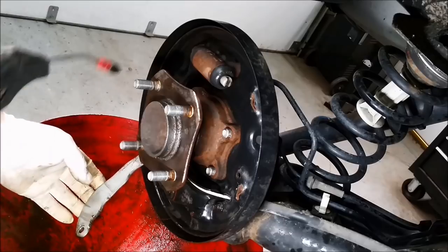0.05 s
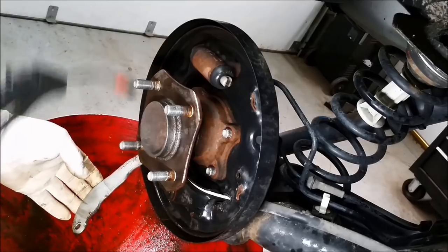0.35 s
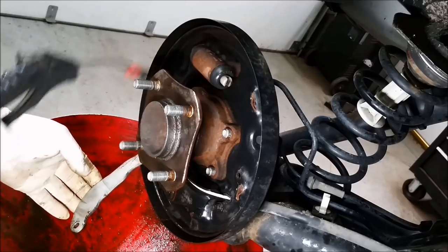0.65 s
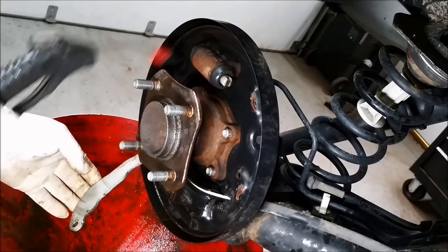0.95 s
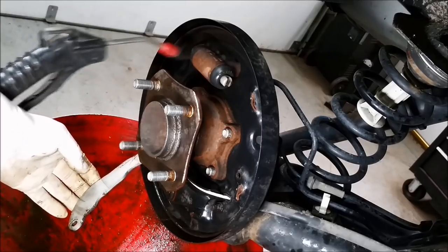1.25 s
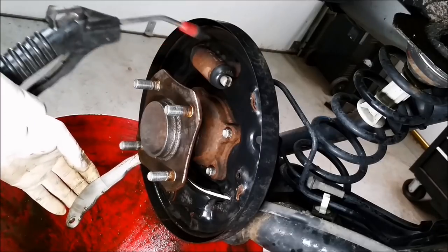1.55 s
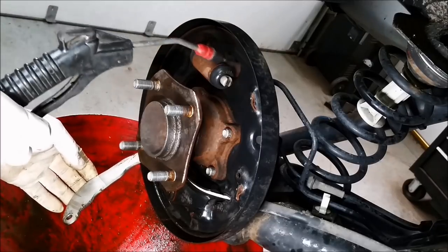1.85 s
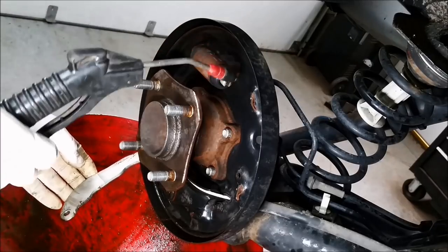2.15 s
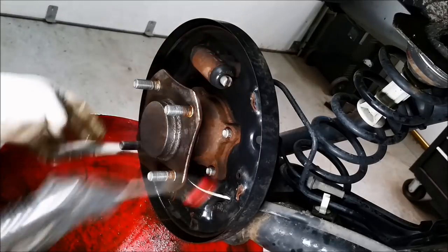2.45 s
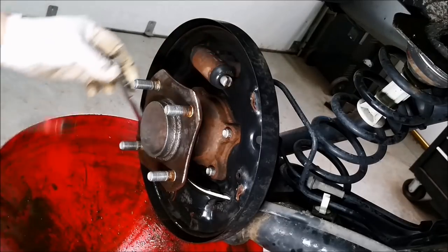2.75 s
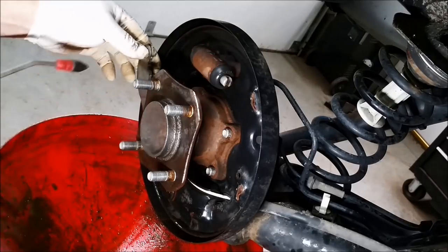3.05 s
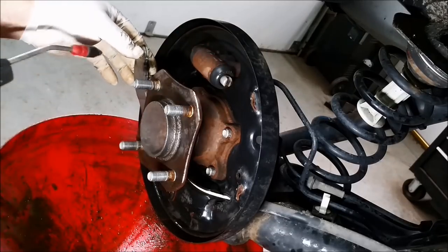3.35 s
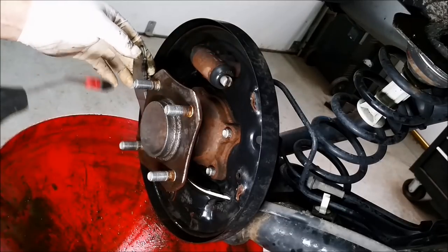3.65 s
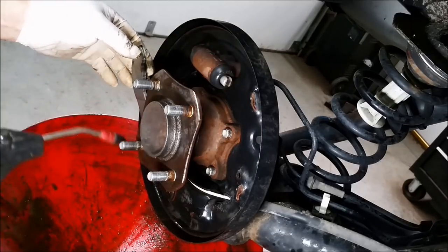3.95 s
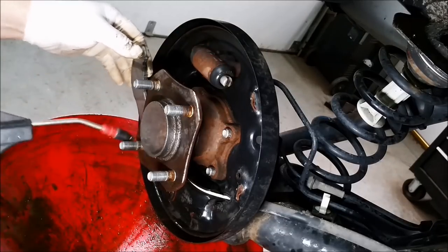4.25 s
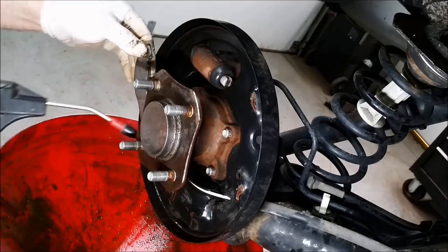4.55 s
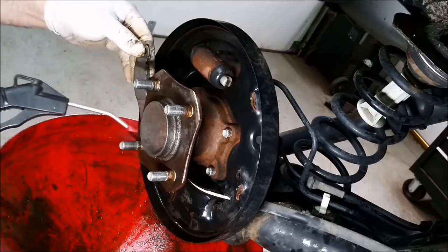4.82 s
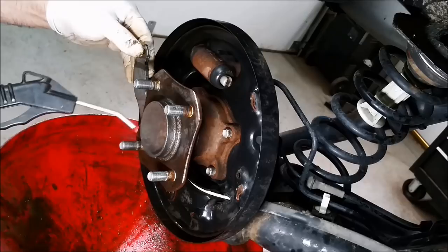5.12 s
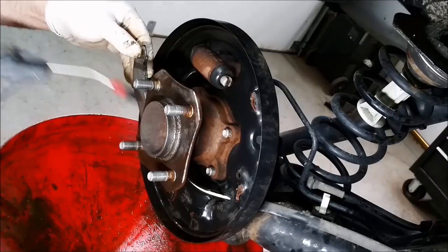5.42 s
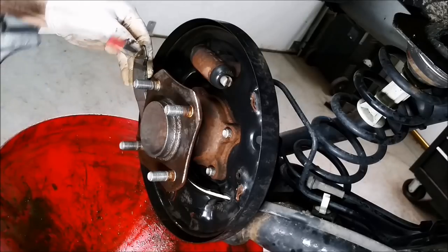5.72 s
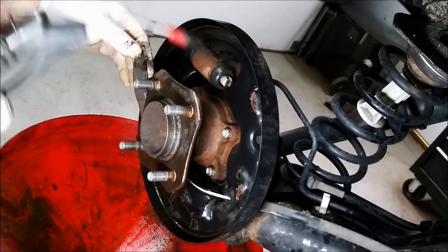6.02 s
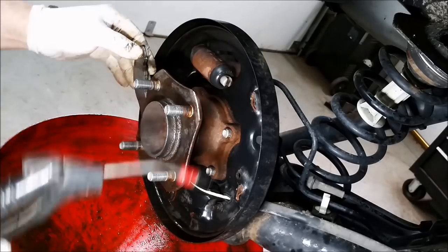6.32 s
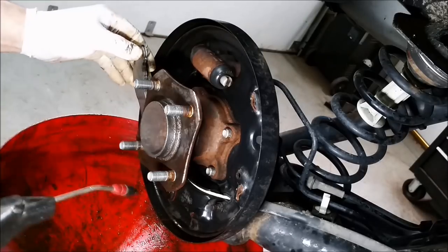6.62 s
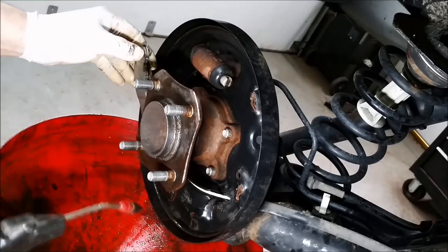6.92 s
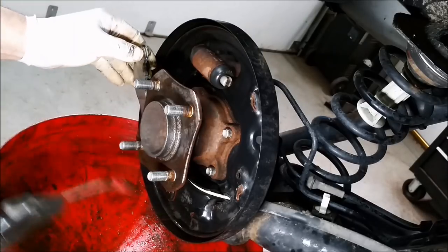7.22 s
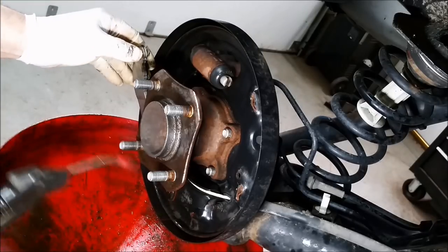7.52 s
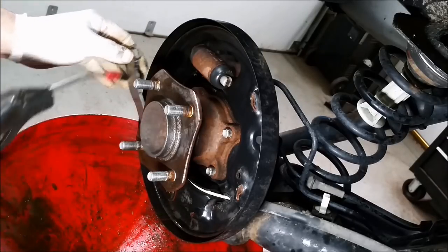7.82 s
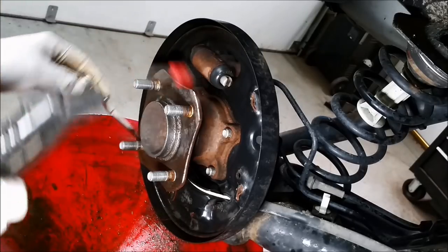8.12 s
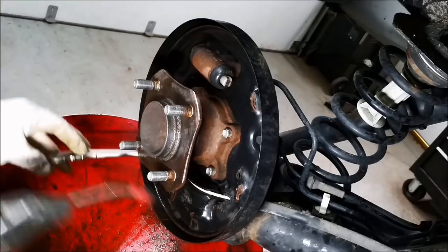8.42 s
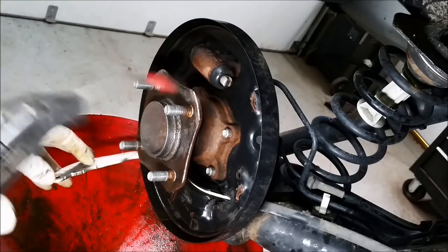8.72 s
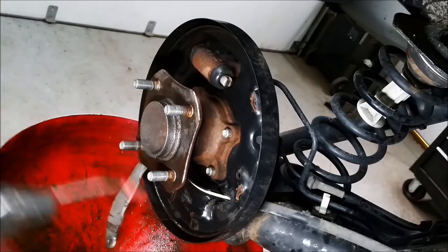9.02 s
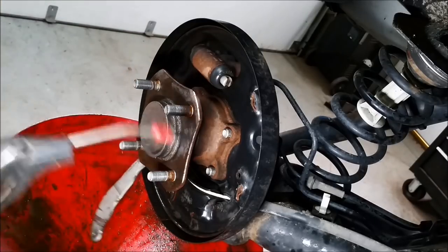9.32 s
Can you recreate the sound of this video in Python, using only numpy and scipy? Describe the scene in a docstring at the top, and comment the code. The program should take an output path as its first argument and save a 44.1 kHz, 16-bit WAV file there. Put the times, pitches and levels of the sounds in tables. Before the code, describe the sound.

Close, loud hissing from an air gun blows water off a metal brake plate in four blasts, separated by short lulls with small puffs. The moving jet keeps changing colour, from a thin high hiss to a sharp rasp, breathy whistles and a hollow roar. Faint droplet ticks and dull hose knocks sit underneath. The final blast is the longest and fades quickly on release, with little echo from the garage.

```python
"""A compressed-air blowgun dries a wet brake backing plate in a garage.
The nozzle hisses; swept about, the jet rasps and sings on edges, roars in hollows and buffets the plate,
whose resonances colour the air noise. The trigger is eased three times, with little spits of air, and
let go at the end. Drops spatter off the metal, hose and cable knock, and a faint hum lies underneath."""
import sys
import numpy as np
from scipy import signal
from scipy.fft import rfft, irfft, next_fast_len
from scipy.io import wavfile

SR = 44100
rng = np.random.default_rng(int(sys.argv[2]) if len(sys.argv) > 2 else 0)


def pcm_store(signal):
    """Save signal as 16-bit PCM."""
    levels = np.round(np.clip(np.atleast_2d(signal), -1, 1) * 32767)
    wavfile.write(sys.argv[1], SR, levels.astype(np.int16).T)


N = 417623
TIME = np.arange(N) / SR
CONTROL_TIME = np.arange(0, N, 32) / SR  # coarse clock for the level curves

# Trigger squeezes. Each row: open at in seconds, hold in seconds, opening rate in dB per second,
# first flow in dB, final flow in dB, seconds to press home.
SQUEEZES = [(0.0, 2.513, 2000, -29.5, -28.5, 1.6), (2.894, 1.163, 800, -37.5, -24.5, 0.94),
            (4.268, 0.021, 500, -52, -54.5, .02), (4.617, .768, 234, -28, -28, 0.44),
            (5.45, .35, 1000, -47.5, -46, .3), (5.8, 3.493, 600, -44, -29, 0.76)]
# Wrist flicks swing the hiss towards or away from us. Each row: middle and length in seconds, gain in dB.
WRIST_SWINGS = [(0.018, .04, 5), (0.104, .045, -5), (0.149, .03, 5), (0.23, 0.086, -3), (.3, 0.037, 4.5),
                (0.422, 0.045, -5.5), (0.482, .04, 3), (0.55, .08, 2.5), (0.803, 0.091, -4.5),
                (1.02, 0.063, -0.5), (1.676, 0.071, 4), (1.81, .04, 3.5), (1.967, 0.028, 3),
                (2.013, 0.036, -4.5), (2.093, 0.094, 3.5), (2.24, 0.1, -2.5), (2.42, .06, 2),
                (2.56, 0.14, -2.5), (3.12, .12, 0.5), (5.155, 0.025, 1.5), (6.882, 0.021, -7),
                (6.93, 0.068, 4.5), (7.113, .08, -2), (7.417, 0.018, 2), (7.862, 0.05, 6.5),
                (7.962, .07, -3.5), (8.122, 0.02, 6), (8.18, 0.043, 4), (8.567, 0.13, 3.5), (8.733, .03, 6),
                (8.95, 0.28, -2), (9.155, 0.069, 5), (9.272, .06, 2.5)]
# The jet's slow sweep. Each row: time in seconds, then rasp, roar and buffet in dB against its force.
SWEEP = [(0.0, -16, -8.5, -24), (.34, -11, -18, -33.5), (.68, -9, -19, -29.5), (.8, -15.5, -20.5, -28),
         (1.0, -13.5, -19, -29), (1.08, -21.5, -28, -33), (1.62, -15, -21, -38), (1.8, -20.5, -28.5, -38.5),
         (2.38, -34, -28, -37.5), (2.54, -6.5, -20, -29), (2.92, -20.5, -19, -16), (3.3, -17, -12, -19),
         (3.82, -15.5, -5.5, -21.5), (4.08, -9, -9.5, -31), (4.78, -13.5, -17, -38),
         (4.9, -22.5, -28.5, -38), (5.38, -18, -19.5, -41), (6.1, -16.5, -14, -27), (6.55, -10, -12, -27),
         (7.15, -9.5, -20, -27.5), (7.7, -9, -11.5, -30), (7.95, -15.5, -18.5, -30), (8.7, -12.5, -13, -33),
         (9.3, -17.5, -23.5, -29.5)]
# The jet crosses a rim, stud or hole. Each row: middle and length in seconds, edge tone in Hz,
# then rasp and roar in dB against its force.
CROSSINGS = [(0.011, 0.051, 2180, -7, 0), (0.169, 0.039, 5080, -1.5, -17), (0.292, 0.037, 4240, -7, -20),
             (0.355, 0.05, 4420, -3, -12), (.475, 0.067, 4390, -2, -26), (.555, 0.13, 4920, -4, -38),
             (.652, .055, 4690, -3.5, -22), (.875, 0.034, 2400, -19, -14.5), (.965, 0.066, 2300, -20, -10),
             (1.394, 0.099, 4200, -16.5, -17), (1.965, .03, 4400, -21, -26), (2.078, 0.079, 4500, -18, -24),
             (2.435, 0.067, 4400, -19, -37), (2.53, 0.092, 3530, -11.5, -18),
             (3.641, 0.043, 2000, -12, -14), (3.713, 0.061, 3800, -10, -7), (4.302, 0.069, 1800, -24.5, -8),
             (4.655, 0.098, 2300, -21, -12.5), (4.827, .06, 4500, -11.5, -14),
             (5.147, .035, 4500, -19, -32), (5.76, 0.032, 1005, -18, -14), (5.976, 0.06, 4060, -4.5, -10.5),
             (6.19, .05, 3800, -13, -14.5), (6.393, 0.11, 3750, -10.5, -9.5),
             (6.588, 0.081, 4010, -9, -9.5), (6.784, 0.037, 4200, -9, -11), (6.836, .025, 4430, 0, -30),
             (6.938, .05, 4630, -1, -33), (7.013, 0.084, 4400, 0.5, -13), (7.319, 0.051, 4020, 1, -13),
             (7.487, 0.045, 4400, -4, -7.5), (7.744, .075, 4400, -3.5, -9.5), (7.788, 0.049, 2200, -7, -3),
             (8.378, .07, 3450, -7.5, -19), (8.488, 0.0617, 2665, -4.5, -12.5), (8.65, .1, 1346, -13, -32),
             (8.79, 0.031, 1800, -12, -13), (8.986, 0.082, 3500, -10.5, -14), (9.089, 0.026, 2440, -7, -8),
             (9.22, 0.056, 2300, -9.5, -23)]
# Square hits on the plate. Each row: middle and length in seconds, buffet in dB against the jet's force.
GUSTS = [(.045, 0.084, -26), (1.18, 0.066, -25.5), (1.395, 0.11, -24.5), (2.965, 0.066, -8.5),
         (3.647, .05, -21), (4.833, .06, -31), (5.768, 0.051, -14), (6.65, 0.096, -16), (6.746, 0.11, -18),
         (6.878, 0.019, -10.5), (7.95, 0.24, -24), (8.81, 0.099, -25)]
# The jet slips off the metal. Each row: middle and length in seconds, change of force in dB.
SLIPS = [(.1, 0.034, -0.5), (0.403, .04, -0.5), (1.287, .08, -4), (1.882, .04, 0), (2.01, 0.036, 1),
         (3.536, 0.065, -4), (3.967, 0.073, -2.5), (4.514, 0.063, -7), (5.815, 0.05, -3.5),
         (6.457, .04, -2), (6.695, 0.079, -4), (6.864, 0.056, -7), (7.414, 0.055, -9), (8.175, 0.072, -3.5),
         (8.844, 0.044, -3), (9.05, 0.023, 4)]
# Whistles and hoots from a hole or a barely open valve. Each row: start and length in seconds,
# first pitch, last pitch and width in Hz, level in dB.
WHISTLES = [(1.853, 0.48, 6780, 6720, 120, -56), (2.92, 1.38, 2500, 2600, 110, -65),
            (2.944, 0.064, 900, 1000, 400, -42), (3.821, 0.31, 2255, 2450, 260, -37.5),
            (4.0, .24, 2550, 2640, 450, -52), (4.356, 0.26, 13350, 13300, 450, -54),
            (4.55, .92, 2236, 2194, 330, -54), (6.746, 0.058, 523, 540, 60, -45)]
# Spits of air at the trigger. Each row: peak time in seconds, level in dB, rise and fall in seconds.
SPITS = [(2.842, -62, .002, 0.022), (4.396, -48, 0.0022, 0.055), (4.431, -48, 0.0097, .018),
         (5.487, -37, .005, 0.022), (5.742, -30, 0.017, 0.013)]
# Hose and cable bumps. Each row: peak time in seconds, level in dB, fall in seconds.
KNOCKS = [(.042, -44, 0.021), (2.845, -59, 0.018), (3.81, -56, 0.024), (4.17, -56.5, 0.068),
          (4.274, -49.5, 0.053), (4.4, -60, 0.17), (4.54, -60, 0.088), (5.985, -55, 0.033),
          (6.876, -53, 0.021), (8.738, -54, .025)]

# Tone colours of the noise layers. Each row: frequency in Hz, relative spectral level in dB.
HISS_COLOUR = [(60, -47), (1200, -33.5), (2200, -20), (3100, -22.5), (4500, -24.5), (7000, -15.5),
               (8300, -11), (9200, -6), (9900, 0), (10700, 1.5), (11500, -1), (13500, -2), (16000, -7.5)]  # bright free jet
RASP_COLOUR = [(50, -62.5), (500, -53), (2400, -18), (3200, -5), (3700, -2), (4600, 0.5), (5500, -4.5),
               (6500, -6.5), (8000, -11), (16000, -13.5)]  # biting air on edges
ROAR_COLOUR = [(50, -55), (300, -26.5), (850, -9), (1400, -1.5), (2000, 2), (2600, 1.5), (3000, -1.5),
               (4500, -17), (9000, -40.5)]  # throaty air in hollows
BUFFET_COLOUR = [(25, -35), (50, -38.5), (90, -15.5), (140, -2.5), (200, -0.5), (255, -2.5), (320, 3.5),
                 (420, 8), (500, -3.5), (700, -1), (1200, -8), (3000, -30)]  # low blast on the plate
BOOM_COLOUR = [(50, -53), (400, -34.5), (730, -6.5), (930, 1), (1150, -3), (1500, -7), (2500, -23)]  # the plate's dish
KNOCK_COLOUR = [(30, -23), (70, -16), (120, 9), (180, -7), (330, -1.5), (600, -12), (2000, -27.5),
                (8000, -54)]  # dull hose and cable
ROOM_TONE_COLOUR = [(25, -6), (50, -9), (120, 5.5), (300, 3.5), (700, -3), (2000, -9), (4500, -7),
                    (8000, -27.5), (16000, -34)]  # the quiet garage
# Resonances of plate and hub. Each row: frequency in Hz, width in Hz, gain in dB.
PLATE_MODES = [(190, 19, -20), (235, 11, -7.5), (313, 30, -6.5), (412, 18, -6), (545, 37, -4.5),
               (596, 20, -10.5), (733, 77, -1), (910, 24, -11), (1090, 39, -9.5), (1144, 18, -8.5),
               (1382, 18, -9.5), (1795, 49, -14), (2640, 35, -26.5), (3900, 13, -25), (4540, 21, -28),
               (5300, 35, -16)]
# The garage's decay. Each row: frequency in Hz, seconds to fall by 60 dB.
GARAGE_DECAY = [(150, 0.35), (1000, 0.14), (4000, 0.28), (11000, 0.18), (16000, 0.24)]
# Stereo tilt. Each row: frequency in Hz, left minus right in dB.
STEREO_BALANCE = [(300, -1), (800, 0.5), (1100, 5.5), (1450, -2), (2000, 1.5), (2700, .5), (3500, 4.5),
                  (4500, 8), (6200, 11), (7700, 3), (9500, -1.5), (11800, -3.5), (14500, 2.5),
                  (16000, -18.5)]
# How alike the two sides are. Each row: frequency in Hz, coherence from 0 to 1.
STEREO_COHERENCE = [(40, 0.67), (130, 1), (300, 0.8), (640, 0.75), (1400, 0.71), (3100, 0.39), (7000, 0.18),
                    (15000, 0.4)]
# Phase between the sides. Each row: frequency in Hz, lead of the left in radians.
STEREO_LEAD = [(100, 0.6), (400, 0.033), (950, 0.72), (2760, 0.017), (4500, 1.26), (15000, 1.17)]


def jet(boom_db=-1, roar_share=0.4, tremor_db=0.65):
    """The free jet hisses, and rasps, roars, buffets and booms where it strikes the brake."""
    _, edges_db, hollows_db, plate_db = np.transpose(SWEEP)
    rasp_db = contact_db(edges_db, [(s, length, db) for s, length, _, db, _ in CROSSINGS])
    roar_db = contact_db(hollows_db, [(s, length, db) for s, length, _, _, db in CROSSINGS])
    buffet_db = contact_db(plate_db, GUSTS)
    hiss = turbulence(HISS_COLOUR, nozzle_db(), band_hz=(9000, 16000), flutter_db=0.83, flutter_hz=34.8)
    rasp = turbulence(RASP_COLOUR, rasp_db, band_hz=(3400, 6500), flutter_db=1.12, flutter_hz=44.7)
    roar = turbulence(ROAR_COLOUR, roar_db, band_hz=(900, 2800), flutter_db=1.27, flutter_hz=44.7)
    buffet = turbulence(BUFFET_COLOUR, buffet_db, band_hz=(150, 600), flutter_db=0.4, flutter_hz=25)
    # the whole dish booms when the jet both fills a hollow and hits squarely
    dish_db = boom_db + roar_share * roar_db + (1 - roar_share) * buffet_db
    boom = turbulence(BOOM_COLOUR, dish_db, band_hz=None, flutter_db=2.05, flutter_hz=30)
    return (hiss + rasp + roar + buffet + boom) * gain_of(tremor_db * drift(rate_hz=7.3))


def turbulence(colour, level_db, band_hz, flutter_db, flutter_hz):
    """Air noise that rides a level curve and flutters as eddies break up."""
    noise = stereo_noise(colour, band_hz)
    return noise * gain_of(np.interp(TIME, CONTROL_TIME, level_db) + flutter_db * drift(flutter_hz))


def flow_db(bleed_db_per_s=201, leak_db=-77):
    """The valve opens, the finger presses home, and on release the air bleeds down to a faint leak."""
    flows = []
    for open_s, held_s, opening_db_per_s, first_db, last_db, press_s in SQUEEZES:
        age = CONTROL_TIME - open_s
        pressed = np.sin(np.pi / 2 * np.clip(age / press_s, 0, 1))
        shut_db = opening_db_per_s * np.maximum(-age, 0) + bleed_db_per_s * np.maximum(age - held_s, 0)
        flows.append(first_db + (last_db - first_db) * pressed - shut_db)
    return np.maximum(np.max(flows, axis=0), leak_db)


def nozzle_db():
    """The hiss rides on the flow and on where the nozzle points."""
    return flow_db() + sum(db * swell(s, length) for s, length, db in WRIST_SWINGS)


def force_db(full_flow_db=-30, db_per_flow_db=0.81):
    """The push on the brake follows the flow more gently than the hiss, and dips as the jet slips off."""
    slips_db = sum(db * swell(s, length) for s, length, db in SLIPS)
    return full_flow_db + db_per_flow_db * (flow_db() - full_flow_db) + slips_db


def contact_db(sweep_db, passes):
    """Level of one air-on-metal layer: slow sweep plus quick passes, driven by the jet's force."""
    sweep_power = gain_of(np.interp(CONTROL_TIME, np.transpose(SWEEP)[0], sweep_db)) ** 2
    pass_power = sum((gain_of(db) * swell(s, length)) ** 2 for s, length, db in passes)
    return force_db() + 10 * np.log10(sweep_power + pass_power)


def brake(air, echo=0.32, sway_s=0.000161, sway_hz=1.255):
    """Echoes off nearby metal shift as the nozzle moves; the plate adds its steady resonances."""
    out = air.copy()
    for delay_s in (.0007, .0016, .0034):
        sway = sway_s * drift(sway_hz)
        for side in range(2):
            late_s = delay_s * (1 + side / 7) + sway  # a little later on the right
            out[side] += echo * np.interp(TIME - late_s, TIME, air[side], left=0)
    out /= np.sqrt(1 + 2 * echo ** 2)
    ring = sum(gain_of(db) * signal.lfilter(*signal.iirpeak(hz, hz / width, SR), out)
               for hz, width, db in PLATE_MODES)
    return out + ring


def edge_tones(against_rasp_db=-3.5, width_share=0.14, fall_share=0.024, stretch=1.35):
    """Whistle rows: each crossing sings a breathy, slightly falling note in step with its rasp."""
    drive_db = force_db()
    rows = []
    for middle_s, length_s, hz, rasp_db, _ in CROSSINGS:
        start_s = max(middle_s - stretch * length_s / 2, 0)
        first_hz, last_hz = hz * (1 + fall_share / 2), hz * (1 - fall_share / 2)
        db = np.interp(middle_s, CONTROL_TIME, drive_db) + rasp_db + against_rasp_db
        rows.append((start_s, stretch * length_s, first_hz, last_hz, width_share * hz, db))
    return rows


def whistles():
    """Air sings at holes, edges and the valve: narrow bands of noise that swell, glide and fade."""
    out = np.zeros((2, N))
    for start_s, length_s, first_hz, last_hz, width_hz, db in WHISTLES + edge_tones():
        hz = np.linspace(first_hz, last_hz, int(length_s * SR))
        real, imag = rng.standard_normal((2, 2, 2 * SR))[:, :, :len(hz)]
        wobble = signal.lfilter(*signal.butter(2, width_hz / SR), real + 1j * imag)
        glide = np.exp(2j * np.pi * np.cumsum(hz) / SR)
        tone = unit_rms((wobble * glide).real)
        side_gains = gain_of(db + curve_at(STEREO_BALANCE, first_hz) * np.array([[.5], [-.5]]))
        out[:, int(start_s * SR):][:, :len(hz)] += side_gains * tone * signal.windows.tukey(len(hz), .5)
    return out


def spits():
    """Short puffs of hiss as the valve cracks open."""
    return stereo_noise(HISS_COLOUR) * sum(burst(*row) for row in SPITS)


def spatter(drops_per_s=45, against_hiss_db=-17, spread_db=-3.5, fall_s=0.00053):
    """Drops torn off the metal tick in the jet, rising and falling with its hiss."""
    hits = rng.random(N) < drops_per_s / SR
    drops = hits * gain_of(spread_db * np.minimum(rng.exponential(1, N), 4))
    envelope = signal.lfilter([1], [1, -np.exp(-1 / (fall_s * SR))], drops)
    ticks = unit_rms(envelope * stereo_noise(HISS_COLOUR))
    return ticks * gain_of(against_hiss_db + np.interp(TIME, CONTROL_TIME, nozzle_db()))


def knocks(rise_s=0.0055):
    """Hose and cable bump with low, damped thuds."""
    return stereo_noise(KNOCK_COLOUR) * sum(burst(s, db, rise_s, fall_s) for s, db, fall_s in KNOCKS)


def garage(air, wet_db=-7, steps=24):
    """The room answers differently from each place the nozzle passes, one tail fading into the next."""
    hop, wet = N // steps, np.zeros((2, N))
    for centre in range(0, N + hop // 2, hop):
        span = np.arange(max(centre - hop, 0), min(centre + hop, N))
        crossfade = np.cos(np.pi / 2 * (span - centre) / hop)
        answer = signal.fftconvolve(air[:, span] * crossfade, room_tail(), axes=1)[:, :N - span[0]]
        wet[:, span[0]:span[0] + answer.shape[1]] += answer
    return (air + gain_of(wet_db) * wet) / np.sqrt(1 + gain_of(wet_db) ** 2)


def room_tail(rise_s=.002):
    """Dense reflections from floor and walls, each band dying at its own speed."""
    hz, t, bands = signal.stft(rng.standard_normal((2, SR // 2)), SR, nperseg=256)
    fade = gain_of(-60 * t / curve_at(GARAGE_DECAY, hz)[:, None])
    tail = signal.istft(bands * fade * np.clip(t / rise_s, 0, 1), SR, nperseg=256)[1]
    # long waves reach both sides alike
    tail[1] += signal.lfilter(*signal.butter(1, 900, fs=SR), tail[0] - tail[1])
    return tail / np.linalg.norm(tail[0])


def room_tone(noise_db=-67, hum_hz=120, hum_db=-75.5):
    """A quiet bed of garage noise and mains hum."""
    hum = unit_rms(np.sin(2 * np.pi * hum_hz * TIME))
    return gain_of(noise_db) * stereo_noise(ROOM_TONE_COLOUR) + gain_of(hum_db) * hum


def stereo_noise(colour, band_hz=None):
    """Wide, coloured noise, scaled so that its mono mix has rms 1 within the band."""
    hz = np.fft.rfftfreq(next_fast_len(N, True), 1 / SR)
    draws = rng.standard_normal((4, len(hz)))
    left, unrelated = draws[::2] + 1j * draws[1::2]
    coherence = np.clip(curve_at(STEREO_COHERENCE, hz), 0, 1)
    right = coherence * left + np.sqrt(1 - coherence ** 2) * unrelated
    right *= np.exp(-1j * curve_at(STEREO_LEAD, hz))
    tilt_db = np.outer([.5, -.5], curve_at(STEREO_BALANCE, hz))
    spectrum = np.array([left, right]) * gain_of(curve_at(colour, hz) + tilt_db)
    in_band = 1 if band_hz is None else (hz > band_hz[0]) & (hz < band_hz[1])
    return irfft(spectrum)[:, :N] / np.std(irfft(spectrum.mean(0) * in_band))


def drift(rate_hz):
    """A random wander of rms 1, up to about the given rate."""
    knots = rng.standard_normal(4096)
    hz = np.fft.rfftfreq(len(knots), TIME[-1] / len(knots))
    slow = unit_rms(irfft(rfft(knots) / np.sqrt(1 + (hz / rate_hz) ** 4)))
    return np.interp(TIME, np.linspace(0, TIME[-1], len(slow)), slow)


def swell(middle_s, length_s, squareness=2.3):
    """A smooth rise to 1 and back, half high at the ends of its length."""
    return .5 ** np.minimum(np.abs(2 * (CONTROL_TIME - middle_s) / length_s) ** squareness, 20)


def burst(peak_s, db, rise_s, fall_s):
    """An envelope that climbs to its peak and dies away."""
    below_peak = np.maximum((peak_s - TIME) / rise_s, (TIME - peak_s) / fall_s)
    return gain_of(db) * np.exp(-np.minimum(below_peak, 20))


def curve_at(points, hz):
    """Reads a table along a log-frequency axis."""
    point_hz, values = np.transpose(points)
    return np.interp(np.log(hz + 1), np.log(point_hz + 1), values)


def gain_of(db):
    """Decibels to a factor."""
    return 10 ** (np.asarray(db) / 20)


def unit_rms(x):
    """Scales to rms 1."""
    return x / np.sqrt(np.mean(x ** 2) + 1e-20)


def scene(air_db=-1.02):
    """Jet and drops colour on the brake and join whistles and spits in the room, over knocks and hum."""
    air = gain_of(air_db) * brake(jet() + spatter()) + whistles() + spits()
    return garage(air) + knocks() + room_tone()


def record(dry):
    """A steep low-pass trims the very top of the hiss."""
    low_pass = signal.firwin(701, cutoff=15850, window=("kaiser", 9), fs=SR)
    return signal.oaconvolve(dry, low_pass[None], "same")


dry = scene()
out = record(dry)
pcm_store(out)
```